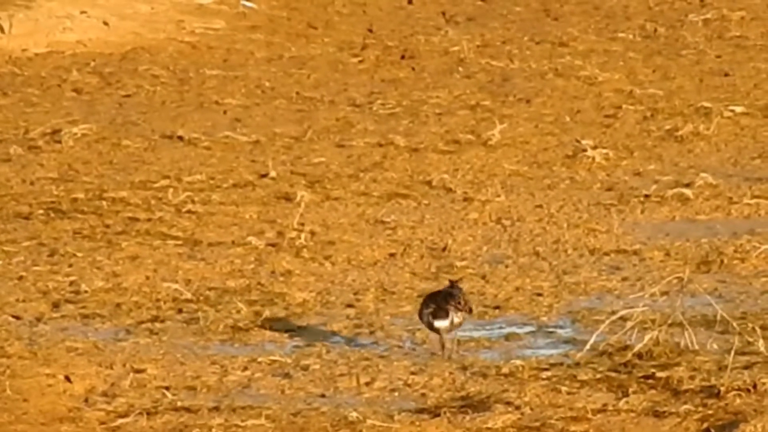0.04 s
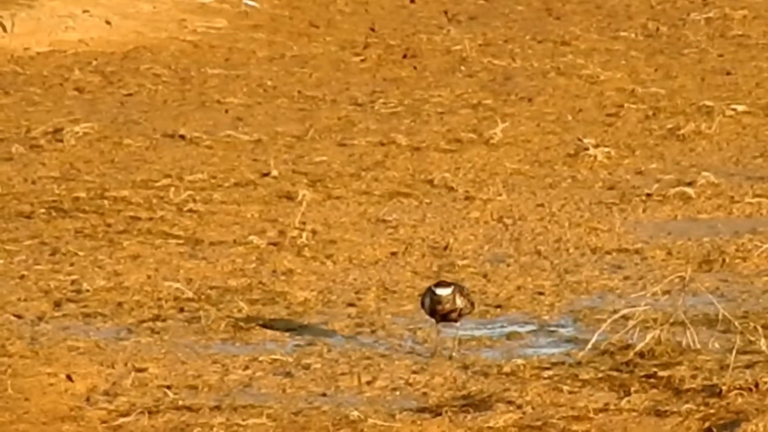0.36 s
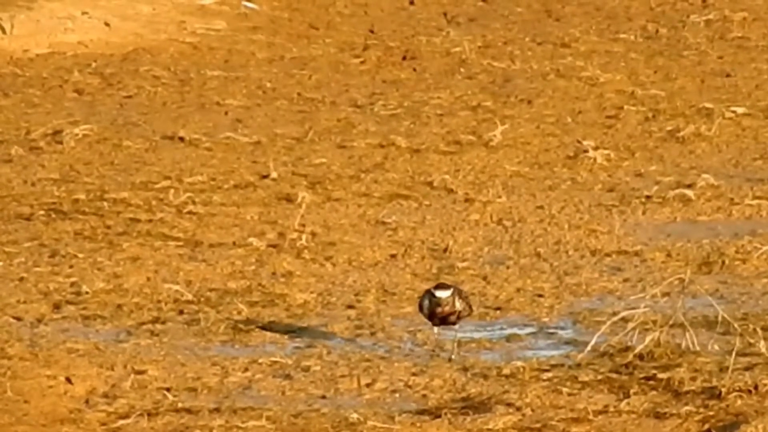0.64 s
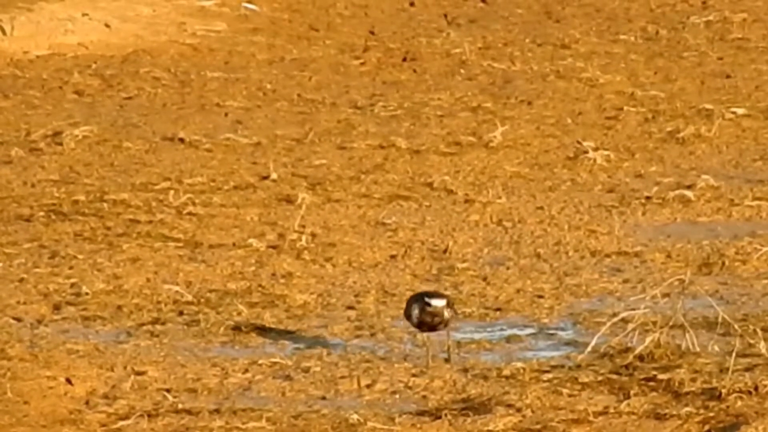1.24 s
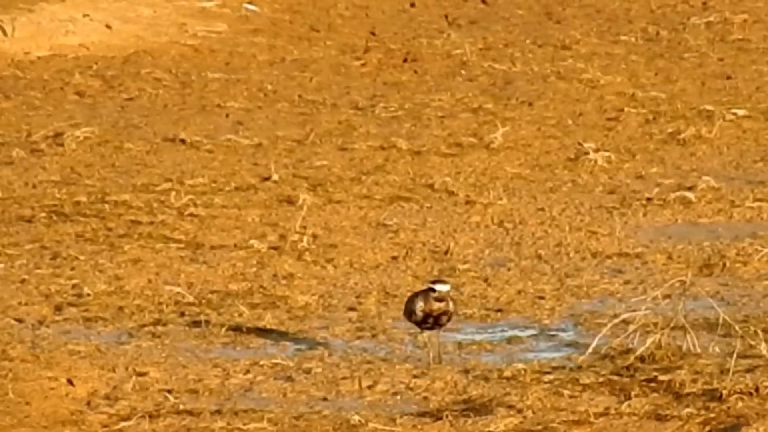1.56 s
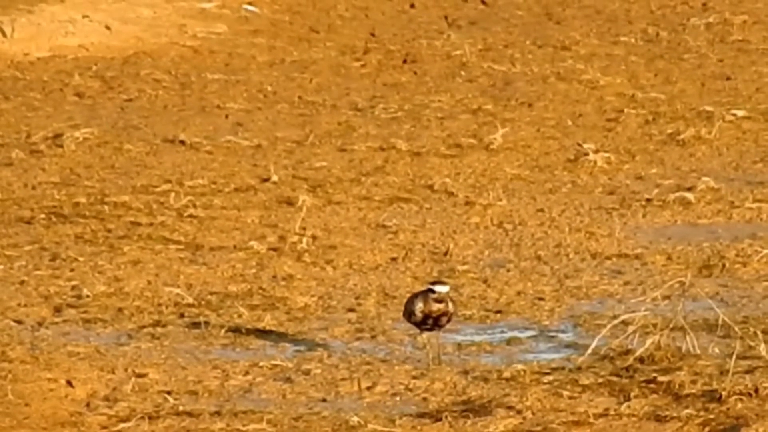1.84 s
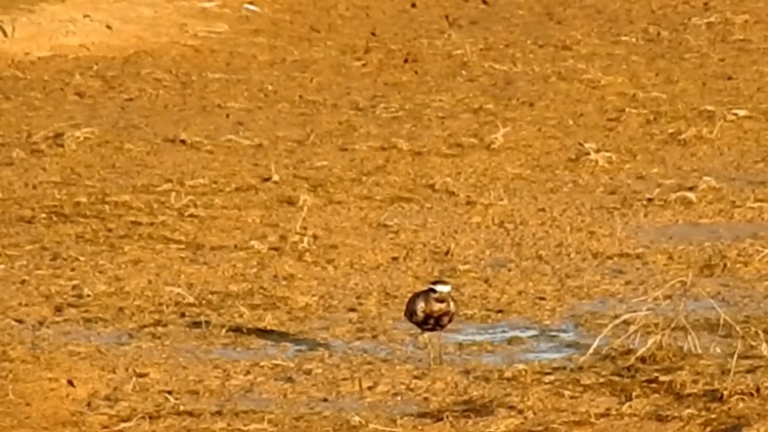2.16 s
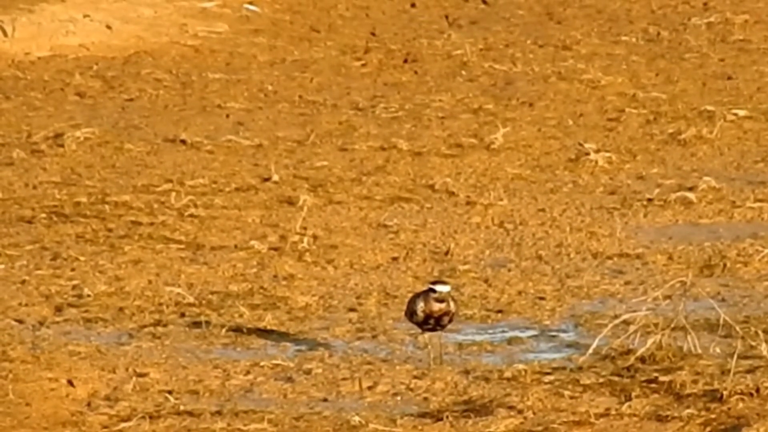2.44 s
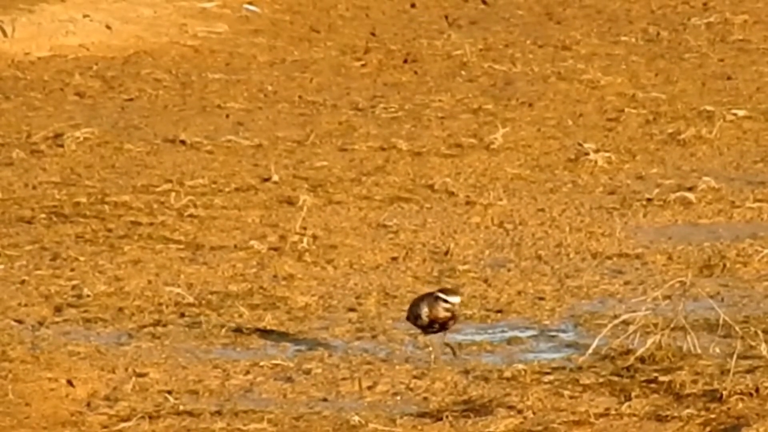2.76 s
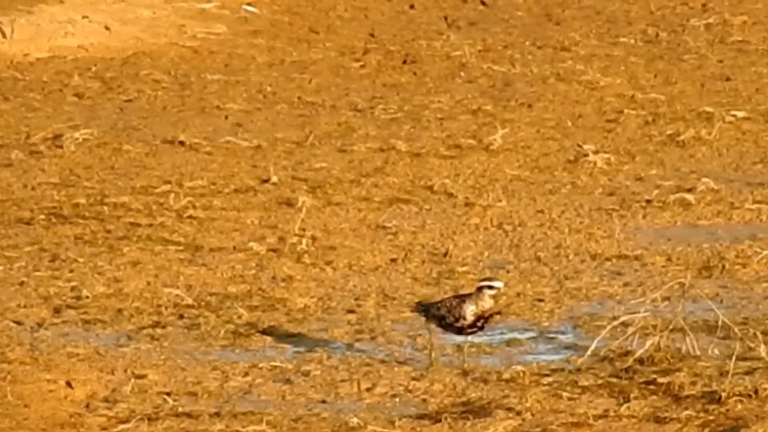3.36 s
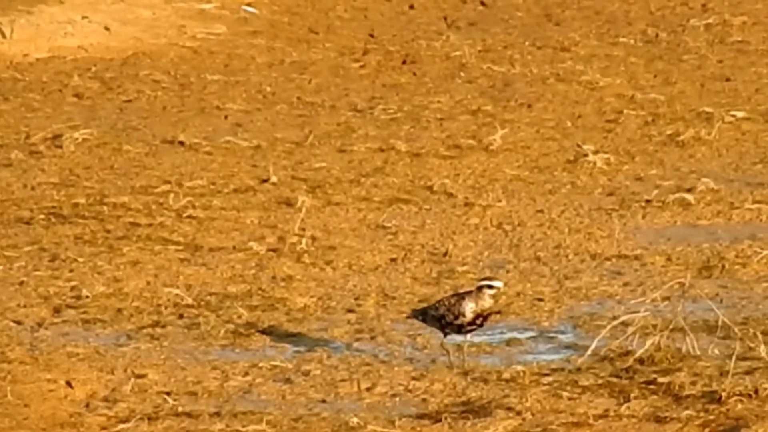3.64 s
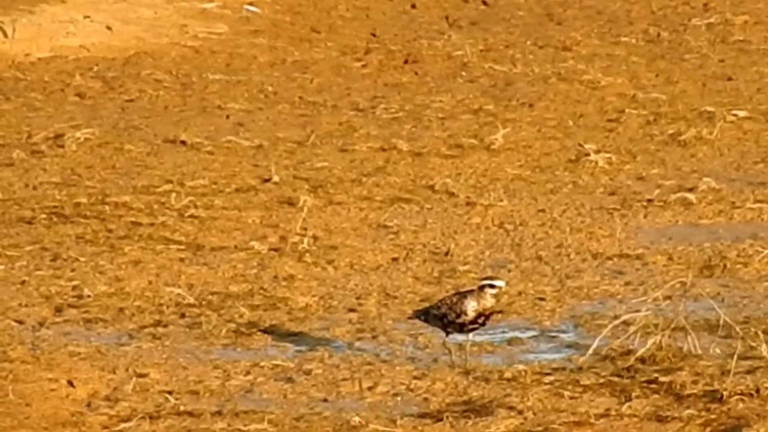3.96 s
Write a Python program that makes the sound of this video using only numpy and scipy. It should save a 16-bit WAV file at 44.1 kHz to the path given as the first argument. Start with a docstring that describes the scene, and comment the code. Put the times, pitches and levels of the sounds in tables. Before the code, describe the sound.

Wind buffets the microphone on an open mudflat, starting as soft puffs over a faint hiss and growing into uneven low rumbling near the end. A tiny close click and a few very faint, distant bird whistles come through.

```python
"""An open mudflat: a bed of faint far-off air and hiss with a thin whine in it, a few distant
bird whistles and a few tiny ticks close by. Wind rises late and buffets the two microphone
ports in turn, its eddies making a low rumble. The camera's wind suppressor then ducks the
middle of the spectrum, leaving the thin whine standing."""
import sys
import numpy as np
from scipy import signal
from scipy.fft import rfft, irfft
from scipy.io import wavfile
from scipy.ndimage import uniform_filter1d

SR = 44100
rng = np.random.default_rng(int(sys.argv[2]) if len(sys.argv) > 2 else 0)


def materialize(psi):
    """Save the field psi as 16-bit PCM at rate SR to the path in sys.argv[1].

    A 1-D psi becomes a single channel; in a 2-D psi each row is a channel.
    """
    bounded = np.clip(np.atleast_2d(psi).T, -1, 1)
    quanta = np.round(bounded * 32767).astype(np.int16)
    wavfile.write(sys.argv[1], SR, quanta)


N = 176400
BIN_HZ = np.fft.rfftfreq(N, 1 / SR)


def undb(db):
    """Decibels to gain."""
    return 10 ** (np.asarray(db) / 20)


def unit_rms(x):
    """Scale to rms 1."""
    return x / np.sqrt(np.mean(x ** 2))


def curve_db(curve, hz):
    """Read an EQ curve of (frequency [Hz], level [dB]) points on a log-frequency axis."""
    point_hz, db = np.array(curve, float).T
    return np.interp(np.log(hz + 1), np.log(point_hz), db)


def equalise(x, curve):
    """Shape a sound with an EQ curve."""
    return irfft(rfft(x) * undb(curve_db(curve, BIN_HZ)), N)


def noise(colour):
    """Noise of rms 1 with the given colour."""
    return unit_rms(equalise(rng.standard_normal(N), colour))


def wander(rate_hz):
    """Smooth random modulation of rms 1, rolling off above rate_hz."""
    rolloff = np.exp(-.5 * (BIN_HZ / rate_hz) ** 2)
    return unit_rms(irfft(rfft(rng.standard_normal(N)) * rolloff, N))


def blurred_tone(hz, width_hz):
    """A tone smeared into a narrow band of noise."""
    phase = 2 * np.pi * np.cumsum(hz * np.ones(N)) / SR
    return unit_rms(wander(width_hz / 2) * np.cos(phase) + wander(width_hz / 2) * np.sin(phase))


# Colour of the air bed (frequency [Hz], relative level [dB])
AIR_COLOUR = [(15, -41), (30, -7), (55, -8), (100, -1.5), (190, -3), (320, -6.5), (550, -10), (900, -10),
              (1500, -15.5), (2300, -18), (3600, -20), (6200, -22), (8500, -26.5), (11000, -31),
              (15500, -39)]
# Stereo width of the air bed (frequency [Hz], side minus mid [dB])
AIR_WIDTH = [(100, -2), (380, -3), (700, -3), (1200, -4), (2400, -1), (4400, -1), (12000, -1.2)]


def far_air(mid_db=-54):
    """Far-off air and hiss: a soft, steady noise bed spread wide."""
    mid = noise(AIR_COLOUR)
    side = equalise(noise(AIR_COLOUR), AIR_WIDTH)
    return undb(mid_db) * np.array([mid + side, mid - side])


# Thin tones in the bed (start [s], end [s], pitch [Hz], bandwidth [Hz], level [dB])
WHINE_TONES = [(0, 0.87, 368, 17, -65), (1.5, 2.8, 738, 10, -74.5), (0.19, 4.6, 885, 37, -75.5),
               (0, 4.1, 1770, 61, -72), (0, 4.1, 3980, 45, -81)]


def whine(t, fade_s=0.08):
    """A thin whine: faint, wavering narrow bands, each held on one pitch."""
    out = np.zeros(N)
    for start, end, hz, width_hz, db in WHINE_TONES:
        fade = np.clip(np.minimum(t - start, end - t) / fade_s, 0, 1)
        out += undb(db) * fade * blurred_tone(hz, width_hz)
    return out


def eddies(colour, evenness=0.54):
    """Low pressure swings of uneven period, compressed to a fairly even size."""
    swings = signal.hilbert(noise(colour))
    power = uniform_filter1d(abs(swings) ** 2, size=500)
    envelope = np.sqrt(uniform_filter1d(power, size=500) + 1e-6)
    return unit_rms(swings.real / envelope ** evenness)


# Gust hits on the microphone (start [s], length [s], left force [dB], right force [dB])
GUST_HITS = [(0.413, 0.029, -43.5, -71), (0.466, 0.03, -66, -50), (0.577, 0.066, -57, -62),
             (.815, 0.021, -48, -74), (1.403, 0.02, -42, -61), (1.478, 0.024, -60, -43),
             (1.519, 0.022, -58, -43.5), (1.726, 0.018, -68, -51), (2.564, 0.025, -52, -40),
             (2.641, 0.012, -38.5, -49), (2.78, 0.016, -41, -49), (2.821, 0.015, -41, -30),
             (2.843, 0.023, -32, -37), (2.897, 0.13, -30.5, -48), (2.967, 0.13, -28.5, -51),
             (3.122, 0.047, -33, -58), (3.333, 0.018, -27, -47), (3.364, 0.023, -33.5, -39),
             (3.41, 0.023, -44, -38), (3.439, 0.022, -19.5, -47), (3.463, 0.062, -44, -21.5),
             (3.535, 0.041, -23, -25), (3.617, 0.036, -23, -52), (3.657, 0.046, -31, -27),
             (3.707, 0.047, -41, -15.5), (3.76, 0.059, -33.5, -35.5), (3.847, 0.025, -20, -39),
             (3.891, 0.014, -14.5, -28), (3.91, 0.038, -21, -12.5), (3.944, 0.044, -25, -18)]


def gust_force(t, port, edge_s=0.014, swirl_s=0.12, swirl_db=-14):
    """Gust envelope at one port: soft-edged hits, each with a weaker swirl around it."""
    power = np.zeros(N)
    for start, length, *port_db in GUST_HITS:
        inside = np.minimum(t - start, start + length - t) / edge_s
        gate = .5 + .5 * np.tanh(2 * inside)
        power += (undb(port_db[port]) * gate) ** 2
    swirl = uniform_filter1d(power, int(swirl_s * SR)).clip(0)
    return np.sqrt(power + swirl * undb(swirl_db) ** 2)


# Level ride of the breeze between gusts (time [s], left level [dB], right level [dB])
BREEZE_RIDE = [(0, -72, -79), (.55, -59, -57), (.85, -58.5, -68), (1.1, -51, -67), (1.45, -60, -50),
               (1.8, -66, -68), (2.0, -54, -64), (2.25, -69, -68), (2.55, -52.5, -60), (4, -43, -55)]
# Body of the buffeting (frequency [Hz], relative level [dB])
BUFFET_COLOUR = [(15, -38), (28, -14), (42, -6), (70, 0.5), (100, 0.5), (135, -11), (190, -27.5),
                 (250, -51), (400, -69), (800, -110)]
# Upper rumble that hard gusts add (frequency [Hz], relative level [dB])
UPPER_RUMBLE_COLOUR = [(50, -25), (90, -1.5), (120, 6.5), (180, 0.5), (225, -13.5), (280, -35), (400, -60),
                       (800, -100)]
# Bite on the hardest gusts (frequency [Hz], relative level [dB])
BITE_COLOUR = [(120, -23), (190, 0.5), (230, 0.5), (280, -7), (330, -14), (390, -33), (480, -67),
               (800, -100)]
# Deep, soft puffs (frequency [Hz], relative level [dB])
PUFF_COLOUR = [(14, -26), (24, -11.5), (42, 1), (75, -1.5), (120, -12.5), (200, -23), (400, -70),
               (800, -100)]


def wind(t, port, strong_gust_db=-16.5, flutter_db=2):
    """Eddies buffet one port (0 left, 1 right); the harder the gust, the higher its rumble reaches."""
    force = gust_force(t, port)
    strength = force / undb(strong_gust_db)
    upper_gain = undb(-6) * strength ** 0.87
    bite_gain = undb(-18.5) * np.minimum(strength, 1) ** 3.1
    ride = np.array(BREEZE_RIDE)
    breeze_db = np.interp(t, ride[:, 0], ride[:, 1 + port]) + flutter_db * wander(rate_hz=6.1)
    gust_puff = undb(-3.5) * np.minimum(force, undb(-38))  # capped, so the puffs stay soft
    puff_gain = np.hypot(undb(breeze_db), gust_puff)
    body = eddies(BUFFET_COLOUR)
    upper_rumble = upper_gain * eddies(UPPER_RUMBLE_COLOUR)
    bite = bite_gain * eddies(BITE_COLOUR)
    return force * (body + upper_rumble + bite) + puff_gain * eddies(PUFF_COLOUR)


# Distant calls (start [s], length [s], first pitch [Hz], last pitch [Hz], level [dB],
# relative blur level [dB], blur width [Hz])
BIRD_CALLS = [(.598, .05, 2590, 2470, -65, -10, 110), (0.638, 0.15, 2510, 2550, -69, -5, 90),
              (.783, .032, 2820, 2850, -63, -10, 110), (2.041, .18, 980, 1149, -74.5, 12, 300),
              (2.168, 0.061, 1593, 1090, -64, -8, 110), (2.933, 0.16, 850, 893, -67, -1, 80)]


def birds(t, fade_s=0.01):
    """Gliding bird whistles, partly blurred by distance."""
    out = np.zeros(N)
    for start, length, first_hz, last_hz, db, blur_db, blur_hz in BIRD_CALLS:
        progress = np.clip((t - start) / length, 0, 1)
        hz = first_hz + (last_hz - first_hz) * progress
        whistle = np.sin(2 * np.pi * np.cumsum(hz) / SR)
        blur = undb(blur_db) * blurred_tone(hz, blur_hz)
        fade = np.clip(np.minimum(progress, 1 - progress) * length / fade_s, 0, 1)
        out += undb(db) * fade * (whistle + blur)
    return out


# Tiny close ticks (time [s], ring pitch [Hz], attack [s], decay [s], envelope peak [dB])
CLOSE_TICKS = [(1.332, 1970, .0003, .0009, -45), (1.3327, 2800, .0003, 0.0017, -43.5),
               (1.3425, 6950, 0.00072, 0.00026, -26.5), (1.3429, 10700, 0.00018, .0003, -46),
               (1.3444, 7200, 0.00057, .0016, -45), (3.043, 1713, 0.002, 0.0025, -42),
               (3.044, 990, 0.0013, 0.0018, -37), (3.0447, 1380, 0.0015, 0.00062, -34)]


def ticks(t):
    """Each tick is one heavily damped ring."""
    out = np.zeros(N)
    for start, hz, attack, decay, db in CLOSE_TICKS:
        age = np.maximum(t - start, 0)
        envelope = np.minimum(age / attack, 1) * np.exp(-np.maximum(age - attack, 0) / decay)
        out += undb(db) * envelope * np.sin(2 * np.pi * hz * age)
    return out


def scene():
    """The stereo mix: wide air, separate wind on each port; whine, birds and ticks in the centre."""
    t = np.arange(N) / SR
    bed = far_air() + whine(t)
    buffeting = np.array([wind(t, port) for port in range(2)])
    return bed + buffeting + birds(t) + ticks(t)


# Mid scoop of the wind suppressor at full depth (frequency [Hz], cut [dB])
DUCK_SCOOP = [(150, 1.5), (300, 9), (500, 13), (1000, 16), (2000, 12), (3400, 8), (4200, 0)]


def wind_suppressor(x, threshold_db=-51.5, range_db=12.5, release_s=0.03, smooth_s=0.03):
    """A ducker keyed by the rumble: the louder it is, the deeper the mids dip, sparing narrow peaks."""
    window, hop = 1024, 256
    hop_s = hop / SR
    hz, _, spectrum = signal.stft(x, SR, nperseg=window, noverlap=window - hop)
    power = np.mean(abs(spectrum) ** 2, axis=0) + 1e-18
    rumble_db = 10 * np.log10(power[hz < 200].sum(axis=0))
    duck = np.tanh(np.maximum(rumble_db - threshold_db, 0) / range_db)
    for i in range(1, len(duck)):
        duck[i] = max(duck[i], duck[i - 1] * np.exp(-hop_s / release_s))
    duck = uniform_filter1d(duck, int(smooth_s / hop_s))
    # Held tones 4 dB above the bands around them escape almost all of the cut.
    held_power = uniform_filter1d(power, int(.05 / hop_s), axis=1).clip(1e-18)
    held_db = 10 * np.log10(held_power)
    prominence_db = held_db - uniform_filter1d(held_db, size=9, axis=0)
    spared = 0.98 * np.clip(prominence_db / 4, 0, 1)
    cut_db = curve_db(DUCK_SCOOP, hz)[:, None] * duck * (1 - spared)
    _, ducked = signal.istft(spectrum * undb(-cut_db), SR, nperseg=window, noverlap=window - hop)
    return ducked[:, :N]


def record(dry, low_cut_hz=29.5, high_cut_hz=15700):
    """The camera's chain: low cut, wind suppressor, steep high cut."""
    low_cut = signal.butter(2, low_cut_hz, "highpass", fs=SR, output="sos")
    high_cut = signal.ellip(10, .2, 80, high_cut_hz, fs=SR, output="sos")
    ducked = wind_suppressor(signal.sosfilt(low_cut, dry))
    return signal.sosfilt(high_cut, ducked)


dry = scene()
out = record(dry)
materialize(out)
```